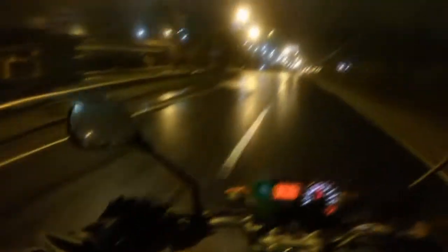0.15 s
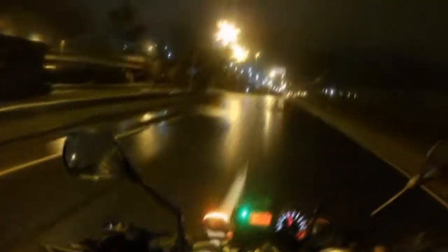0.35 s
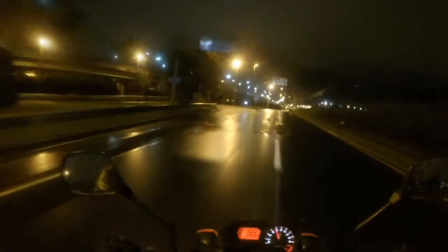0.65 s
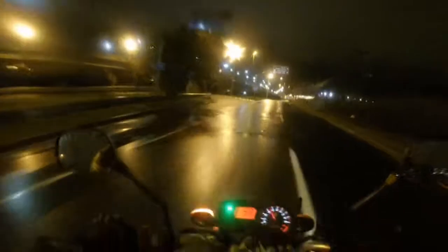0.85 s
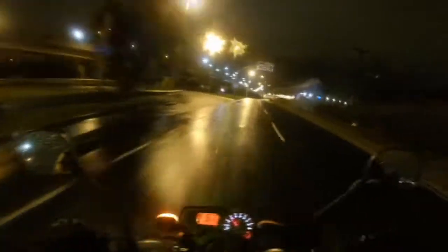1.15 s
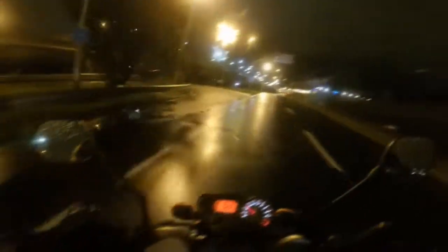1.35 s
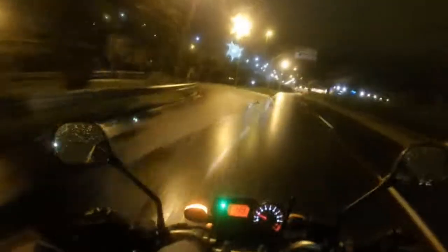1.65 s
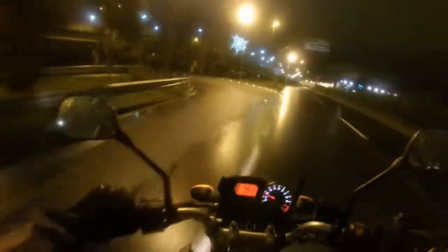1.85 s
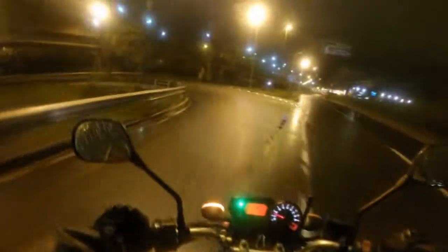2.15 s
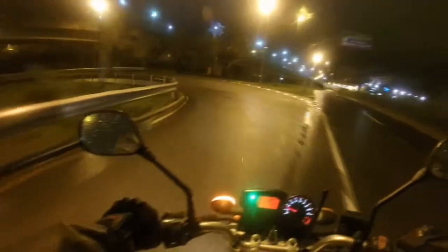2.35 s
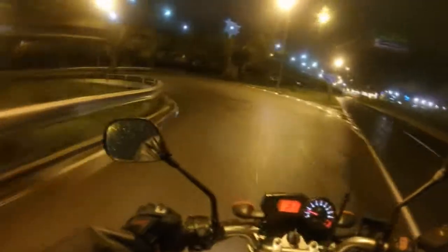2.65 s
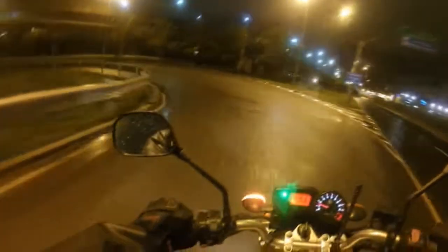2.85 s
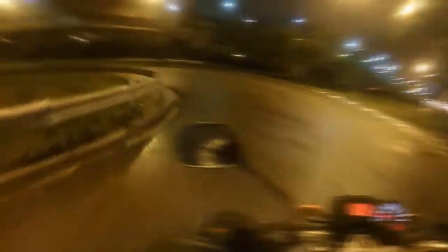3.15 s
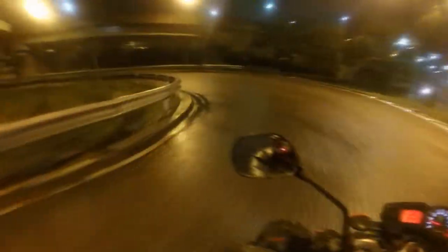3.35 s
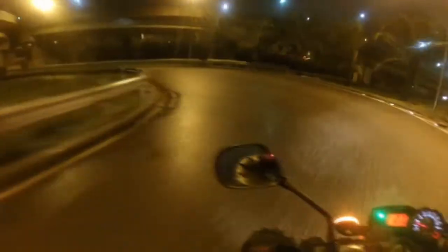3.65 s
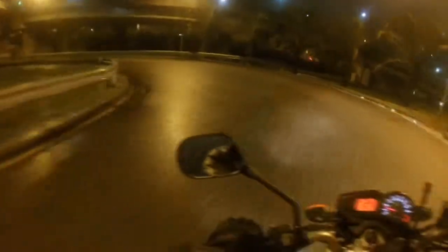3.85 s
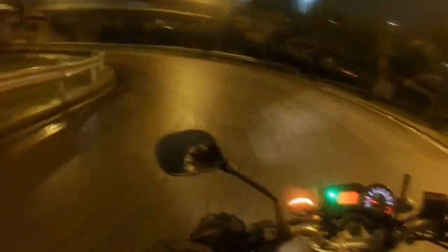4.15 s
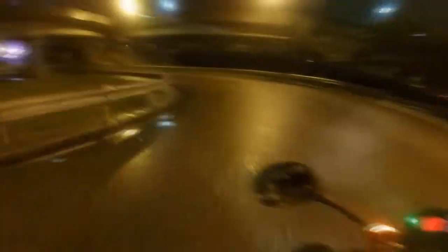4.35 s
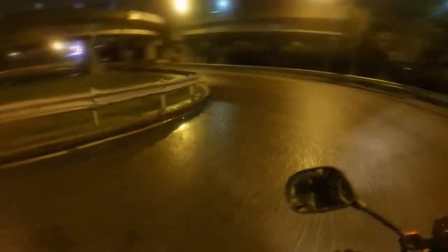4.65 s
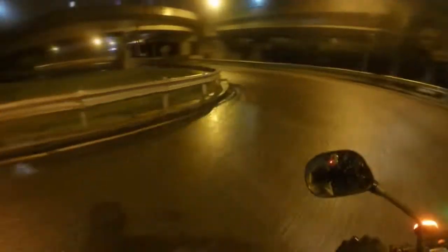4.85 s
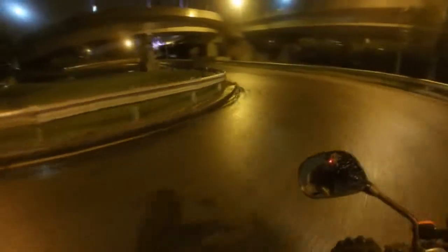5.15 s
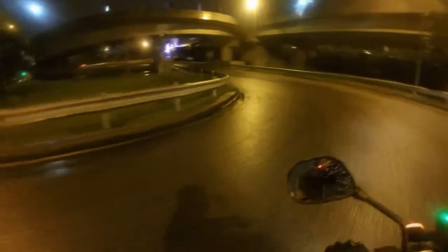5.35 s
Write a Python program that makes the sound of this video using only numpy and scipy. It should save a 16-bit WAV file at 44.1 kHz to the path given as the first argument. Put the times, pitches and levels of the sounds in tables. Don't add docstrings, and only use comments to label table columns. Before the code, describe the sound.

Wind thumps and rushes over a rider's helmet-mounted camera case as a small motorcycle slows into a wet bend, engine rattle slowing then fading.

```python
import sys
import numpy as np
from scipy import signal
from scipy.io import wavfile
from scipy.ndimage import uniform_filter1d

SR = 44100
rng = np.random.default_rng(int(sys.argv[2]) if len(sys.argv) > 2 else 0)


def put_to_file(sound):
    columns = np.atleast_2d(sound).T
    safe = np.clip(columns, -1, 1)
    whole_steps = np.round(safe * 32767)
    wavfile.write(sys.argv[1], SR, whole_steps.astype(np.int16))


def ratio_of_db(decibels):
    return 10 ** (np.asarray(decibels, float) / 20)


N = 242991
TIME_S = np.arange(N) / SR

# t/s, air flow level/dB, spray level/dB
WIND = [(0, -43.5, -51.5), (.45, -44.5, -54), (.9, -46, -54), (1.3, -48.5, -54), (1.6, -49, -53.5),
        (1.86, -49.5, -54.5), (2.1, -52, -55.5), (2.6, -52.5, -57.5), (3.1, -54, -60), (3.6, -54, -62),
        (4.1, -55, -64), (4.55, -54, -62.5), (4.95, -55, -64.5), (5.51, -53.5, -62.5)]
CALM_DB = -55
# f/Hz, width/Hz, level/dB
CASE_BODY = [(600, 480, -7), (1495, 270, 5.5), (2430, 430, -3), (3630, 2000, -11.5)]


def rms_one(x):
    return x / np.sqrt(np.mean(x ** 2) + 1e-20)


def noise():
    return rng.standard_normal(N)


def in_time(rows):
    s, *columns = np.transpose(rows)
    return [np.interp(TIME_S, s, column) for column in columns]


def swells(rows, length=None):
    return sum(ratio_of_db(row[1]) * np.exp(-((TIME_S - row[0]) / (length or row[-1])) ** 2) for row in rows)


def drift(rate_hz):
    r = np.exp(-80 * np.pi * rate_hz / SR)
    settled = signal.lfilter([1], [1, -2 * r, r * r], rng.standard_normal(N // 40 + 2002))[2000:]
    return np.interp(np.arange(N) / 40, np.arange(len(settled)), rms_one(settled))


def band(x, low_hz, high_hz):
    sos = signal.butter(2, [low_hz, min(high_hz, .45 * SR)], "band", fs=SR, output="sos")
    return signal.sosfilt(sos, x)


def resonate(x, peaks):
    out = 0
    for k, (hz, width_hz, level_db) in enumerate(peaks):
        r = np.exp(-np.pi * width_hz / SR)
        gain = ratio_of_db(level_db) * (-1) ** k * (1 - r * r) / 2
        out = out + signal.lfilter([gain, 0, -gain], [1, -2 * r * np.cos(2 * np.pi * hz / SR), r * r], x)
    return out


def ring(x, hz, t60):
    r, w = ratio_of_db(-60 / (t60 * SR)), 2 * np.pi * hz / SR
    return signal.lfilter([0, np.sin(w)], [1, -2 * r * np.cos(w), r * r], x + 1e-18)


def puff(length_s, span):
    age = np.arange(span) / SR / max(length_s, .002)
    return np.minimum(age * 4.8, 1) ** 2 * np.exp(-age ** 2)


def banded_noise(spectrum, gust, patchy_db, flicker_hz):
    hz, level_db = np.transpose(spectrum)
    edges = np.geomspace(hz[0], hz[-1], int(3 * np.log2(hz[-1] / hz[0])) + 2)
    white, out = rng.standard_normal((2, N)), 0
    for k, (low, high) in enumerate(zip(edges, edges[1:])):
        centre_db = np.interp(np.log(low * high) / 2, np.log(hz), level_db)
        gain = ratio_of_db(centre_db + patchy_db * (gust + drift(flicker_hz)))
        out = out + gain * band(white[k % 2], low, high)
    return rms_one(out)


def buffet():
    # t/s, level/dB, swing f/Hz, half length/s
    shoves = [(.054, -32.5, 71.3, 0.045), (.189, -32.5, 78.4, 0.038), (.304, -28, 74, 0.033),
              (.406, -33, 72.1, 0.031), (.484, -32.5, 68.2, 0.015), (.562, -28.5, 66, 0.038),
              (.631, -36, 69.8, .018), (.7, -46, 69.5, 0.027), (.79, -35.5, 68.3, .03),
              (.9, -35.5, 68, 0.062), (1.034, -36.5, 69.1, 0.047), (1.13, -38.5, 72.5, 0.025),
              (1.24, -38, 71.7, 0.052), (1.378, -42, 73, 0.033), (1.623, -49, 72.2, 0.036),
              (1.71, -48, 70.5, .04), (1.8, -45, 70.7, 0.07), (1.96, -46, 64.8, 0.097),
              (2.13, -48, 65.4, .07), (2.66, -50, 65, 0.059), (2.96, -49, 60.9, 0.054),
              (3.155, -50, 70, 0.038), (3.343, -48, 66.7, 0.058), (3.825, -52, 68.9, 0.029),
              (4.479, -45, 70, 0.054), (4.76, -48.5, 64, 0.12), (4.984, -47.5, 59.8, 0.026),
              (5.12, -43, 62.15, 0.063), (5.25, -43.5, 64.6, 0.052), (5.47, -46, 68, 0.068)]
    # t/s, level/dB
    thuds = [(.0, -26), (.12, -46), (.24, -34), (.62, -29.5), (.71, -41.5), (.85, -41), (1.32, -43),
             (1.41, -38), (1.49, -46), (1.84, -40), (2.33, -41), (2.49, -47), (3.21, -45), (3.4, -46),
             (4.24, -48), (4.32, -45), (4.48, -41.5), (4.85, -61), (5.05, -51), (5.16, -47)]
    flow_db = in_time(WIND)[0] - CALM_DB
    swing_hz = in_time(shoves)[1] + 3.9 * drift(10.0)
    swing = np.sqrt(2) * np.sin(2 * np.pi * np.cumsum(swing_hz) / SR)
    eddies = rms_one(band(noise(), 49.8, 100.0))
    thud = rms_one(band(noise(), 73, 123))
    shoved = swells(shoves) * (swing + 0.33 * eddies)
    swaying = ratio_of_db(-54 + 0.6 * flow_db) * (0.35 * swing + 1.34 * eddies)
    thudding = (swells(thuds, length=0.022) + ratio_of_db(-58 + 0.66 * flow_db)) * thud
    return shoved + swaying + ratio_of_db(-6.0) * thudding


def slow_pressure(flow_db):
    # t/s, level/dB, half length/s
    pressure_swells = [(.05, -34, 0.024), (.43, -48, 0.11), (1.58, -43, .1), (1.8, -46, .1),
                       (1.97, -37, .05), (2.18, -51, .04), (2.5, -48, 0.13), (3.13, -50.5, .08),
                       (3.58, -52, 0.12), (4.13, -54, .08), (4.69, -51, .07), (5.3, -62, .2)]
    pressure = swells(pressure_swells) + ratio_of_db(-56 + flow_db)
    return pressure * rms_one(band(noise(), 12.7, 31.0))


def wind_roar(gust):
    # f/Hz, level per Hz/dB
    roar_spectrum = [(88, -29), (150, -1), (323, -4), (468, -5.5), (531, -7), (660, -7.5), (1110, -13),
                     (1300, -15), (1690, -32), (2860, -120)]
    # f/Hz, width/Hz, level/dB
    helmet_peaks = [(464, 35, -9), (660, 45, -12)]
    roar = banded_noise(roar_spectrum, 0.12 * gust, patchy_db=1.0, flicker_hz=4.2)
    return roar + 12.8 * resonate(noise(), helmet_peaks)


def cavity_rush(gust, flow_db, blast_db):
    cavity_notes = [
        [(1530, 292, -2), (1823, 416, -3.5)],
        [(2430, 350, 17), (2710, 1700, -25)],
        [(2870, 390, 9), (4030, 930, -1)],
    ]
    rush_rule = [
        (-56, 1.174, 0.9, 0.13),
        (-57.5, 1.2, 0.12, 0.58),
        (-63.5, 1.11, 1.4, -1.6),
    ]
    # t/s, level/dB, half length/s
    side_wind = [
        (1.082, 2.5, 0.34),
        (2.35, 3.5, .2),
    ]
    side_db = sum(db * np.exp(-((TIME_S - s) / length) ** 2) for s, db, length in side_wind)
    out = 0
    for peaks, (calm_db, follows, blown, turned) in zip(cavity_notes, rush_rule):
        breath = band(noise(), 0.66 * peaks[0][0], 1.016 * peaks[-1][0])
        note = rms_one(resonate(breath, peaks))
        level_db = calm_db + follows * flow_db + blown * blast_db + turned * side_db
        flutter_db = 0.16 * gust + 0.69 * drift(23) + 1.17 * drift(8.8)
        out = out + ratio_of_db(level_db + flutter_db) * note
    return out


def spray_hiss(gust):
    # f/Hz, level per Hz/dB
    hiss_spectrum = [(2180, -38), (3700, 3.5), (4070, -16), (4570, -1.5), (5620, -0.5), (7110, -6),
                     (8530, -10), (12800, -24), (14100, -11), (15100, -36)]
    return band(banded_noise(hiss_spectrum, 0.51 * gust, patchy_db=1.25, flicker_hz=35), 4000, 12000)


def air():
    roar_db, hiss_db = in_time(WIND)
    flow_db = roar_db - CALM_DB
    blast_db = 7 * np.exp(-TIME_S / 0.088)
    gust = drift(22)
    roar = ratio_of_db(roar_db + blast_db) * wind_roar(gust)
    spray = ratio_of_db(hiss_db + .2 * blast_db + 3.0) * spray_hiss(gust)
    return slow_pressure(flow_db) + roar + cavity_rush(gust, flow_db, blast_db) + spray


def engine():
    # t/s, crank rate/turns per s, drag on the gears/dB, looseness/0-1
    crank = [(0, 150, -17, .7), (.6, 135, -11, .7), (.8, 133, -4.5, 0.8), (1.1, 117, -4, 0.7),
             (1.2, 110, 0, .7), (1.4, 111, 0.5, 0.9), (1.65, 106, 1.3, 0.8), (2.05, 106, -1.5, 0.9),
             (2.4, 106, -1.5, 0.7), (2.7, 78, -2.5, 0.79), (3.05, 70.5, -4, 0.99), (3.35, 55, -7, 0.39),
             (3.7, 51.4, -5.5, 0.5), (4.0, 55, -7.5, .3), (4.4, 31, -17, 0.82), (4.7, 27.7, -13, 0.47),
             (5.51, 25.7, -16, 0.57)]
    # f/Hz, level/dB, t60/s
    sump = [(4200, 0, .024)]
    chain_case = [(4340, -6, .012), (4460, 0, .02), (4590, -5, .012)]
    cover = [(4825, 0.97, 0.025), (4965, -2, 0.035)]
    fins = [(5300, -23, 0.015), (5950, -15.5, 0.002)]
    valve = [(6700, -4, .006), (8520, 0, .013), (9800, -12, .005)]
    part_rule = [
        (-62, 0.76, -2),
        (-58, 1.23, -3.5),
        (-56, 1.2, 11),
        (-56.5, 1.8, 3.5),
        (-69, 0.96, 14),
    ]
    # t/s, level/dB, half length/s
    sympathy = [
        [(.8, -63, 0.18), (1.5, -62, 0.07), (1.8, -63, 0.072)],
        [(1.4, -58, 0.13), (1.63, -55.5, 0.12), (2.2, -56, 0.12)],
        [(1.945, -62, .1), (2.4, -70, .1), (2.85, -63.5, 0.42)],
        [(1.42, -58, 0.11), (1.8, -67, 0.087), (2.2, -67, .1)],
        [(.8, -79, .15), (1.19, -63, 0.048), (1.33, -63, .07)],
    ]
    clutch_s, clutch_takes_s, clutch_db = 4.02, .09, -14
    even_turns, cruise_turns = 56, 120

    turns_per_s, drag_db, loose = in_time(crank)
    loose = np.clip(loose, 0, 1)
    free = np.clip((TIME_S - clutch_s) / clutch_takes_s + .5, 0, 1)
    weak_db = -4 * np.clip(np.log2(turns_per_s / even_turns), 0, 1) - 8 * free
    turns = np.cumsum(turns_per_s) / SR
    odd = turns % 2 >= 1
    second = ratio_of_db(weak_db * odd)
    side = rng.choice([-1, 1], N)
    parts = [(sump, 0, second, .9), (chain_case, 0, second, 1.0), (cover, .3, second, 1.6),
             (fins, .15, ratio_of_db(3.5 * weak_db * odd), 1.2), (valve, .6, ~odd, .25)]
    out = 0
    for (modes, lag, share, chatter), (base_db, follows, octave_db), peaks in zip(parts, part_rule, sympathy):
        knock = np.diff(np.floor(turns - lag), prepend=0) > 0
        part = 0
        for hz, db, t60 in modes:
            strength = ratio_of_db(0.99 * noise()) * side
            knocks = knock * share * strength * np.sqrt(SR / turns_per_s)
            part = part + ratio_of_db(db) * ring(knocks + chatter * loose * noise(), hz, t60)
        edges = .9 * modes[0][0], 1.12 * modes[-1][0]
        part = band(band(part, *edges), *edges)
        steady = part / np.sqrt(uniform_filter1d(part ** 2, size=9000) + 1e-12)
        speed_db = octave_db * np.log2(turns_per_s / cruise_turns)
        level_db = base_db + follows * drag_db + speed_db + clutch_db * free
        out = out + (ratio_of_db(level_db) + swells(peaks)) * steady
    return out


def case_taps():
    # t/s, body level/dB, body f/Hz, bright level/dB
    tap_rows = [(0.281, -30, 1530, -60), (0.4204, -38, 1500, -57), (0.517, -50, 1730, -56),
                (0.7574, -53, 1610, -48), (1.618, -50, 1760, -48), (1.716, -29, 1750, -46),
                (1.749, -40, 1673, -49), (1.774, -37, 1530, -51), (1.8043, -28, 2320, -38.5),
                (1.8096, -47, 1620, -49), (1.848, -33, 1800, -45), (1.876, -41, 2340, -56),
                (2.86, -44, 1645, -51), (2.8917, -27, 2670, -40.5), (2.955, -52, 2416, -60),
                (3.292, -51, 2300, -55), (3.333, -58, 1730, -51.5), (3.4794, -44, 1598, -56),
                (4.0602, -39.5, 1630, -54), (4.069, -50, 1755, -61), (4.412, -39, 2390, -69),
                (4.4263, -35, 1139, -70), (4.454, -33.5, 2310, -70), (4.5185, -43, 1520, -59),
                (4.6226, -42, 2380, -51), (4.6375, -35, 2430, -51), (5.106, -40.5, 2300, -59),
                (5.158, -36.5, 2280, -56), (5.1706, -36, 1535, -58), (5.231, -45, 1468, -63)]
    tap_s = 0.013
    out, span = np.zeros(N), int(.06 * SR)
    scrub, colour = rng.standard_normal((len(tap_rows), 2, span)), rng.random(len(tap_rows))
    shape = puff(tap_s, span)
    for (s, body_db, body_hz, bright_db), (dull, sharp), tint in zip(tap_rows, scrub, colour):
        body = rms_one(resonate(shape * dull, CASE_BODY + [(body_hz, 250, 4.0)]))
        bright_hz = 4450 + 1770 * tint ** 2
        crackle = resonate(shape * sharp, [(bright_hz, 600, 4.0), (5600, 3000, 0)])
        bright = rms_one(band(crackle, 3900, 7900))
        tap = np.sqrt(tap_s) * (ratio_of_db(body_db + 0.5) * body + ratio_of_db(bright_db + 7.5) * bright)
        at = int(s * SR)
        out[at:at + span] += tap[:N - at]
    return out


def water_drops():
    # t/s, peak level/dB
    splashes = [(0.28, -44), (0.4194, -44), (1.87, -57), (1.931, -55), (2.4684, -52), (2.893, -39),
                (2.8974, -57), (2.965, -61), (3.2884, -55), (4.0617, -54), (4.7453, -55), (4.8795, -57),
                (4.957, -64), (5.2416, -62), (5.2993, -57)]
    out, span = np.zeros(N), int(.06 * SR)
    shape = puff(0.0052, span)
    for s, level_db in splashes:
        at, hz = int(s * SR), 9400 + 1100 * rng.random()
        splash = band(shape * rng.standard_normal(span), 0.64 * hz, 1.05 * hz)
        out[at:at + span] += ratio_of_db(level_db + 0.5) * splash[:N - at]
    return out


def dry_knock():
    # t/s, peak level/dB, f/Hz, t60/s
    knock_rows = [
        (2.4583, -23.5, 2464, 0.015),
    ]
    out = 0
    for s, level_db, hz, t60 in knock_rows:
        push = np.sin(2 * np.pi * hz * TIME_S) * np.exp(-((TIME_S - s - .001) / 0.00058) ** 2)
        out = out + ratio_of_db(level_db - 30.5) * ring(push, hz, t60)
    return out


def strap():
    # t/s, level/dB, half length/s
    rubs = [
        (4.39, -51.5, 0.048),
        (4.47, -54, 0.038),
        (4.535, -60, 0.027),
        (4.63, -57, .025),
    ]
    rough = noise() * ratio_of_db(3.6 * drift(54))
    return swells(rubs) * rms_one(resonate(rough, CASE_BODY + [(2400, 330, 6)]))


def catch():
    # t/s, peak level/dB
    ticks = [
        (.4205, -49),
        (0.5195, -50),
        (4.062, -47.5),
    ]
    # f/Hz, level/dB, t60/s
    catch_modes = [(4570, -8, .012), (6348, 2.5, 0.029), (7360, -8, .08), (10150, -8.5, .03),
                   (13000, -14, .01)]
    out = 0
    for hz, db, t60 in catch_modes:
        clicks = np.zeros(N)
        for s, level_db in ticks:
            first, second = rng.standard_normal(2)
            clicks[int(s * SR)] = ratio_of_db(level_db + db + 3.1 * first)
            clicks[int((s + .004) * SR)] = ratio_of_db(level_db + db - 6.0 + 1.5 * second)
        out = out + ring(clicks, hz, t60)
    return out


def tyres():
    # t/s, level/dB, half length/s
    hum = [
        (3.0, -68, .25),
        (3.8, -62.5, 0.49),
    ]
    note = [(599.6, 22, 0)]   # f/Hz, width/Hz, level/dB
    return swells(hum) * rms_one(resonate(resonate(noise(), note), note))


def scene():
    contacts = case_taps() + water_drops() + dry_knock() + strap() + catch()
    return (buffet() + air() + engine() + contacts + tyres())[None]


def roll_off(x):
    return signal.sosfilt(signal.butter(12, 15240, fs=SR, output="sos"), x)


def record(dry):
    low_pass = signal.cheby2(14, 60, 15700, fs=SR, output="sos")
    return roll_off(signal.sosfilt(low_pass, dry))


dry = scene()
out = record(dry)
put_to_file(out)
```